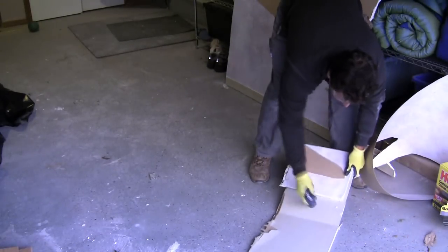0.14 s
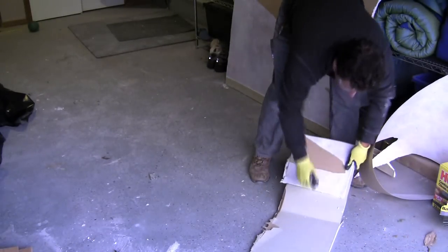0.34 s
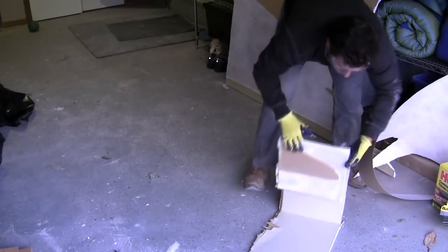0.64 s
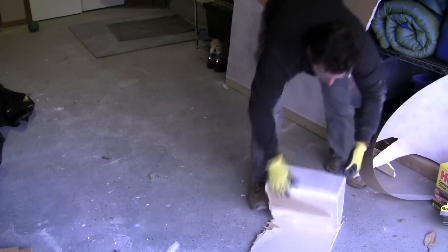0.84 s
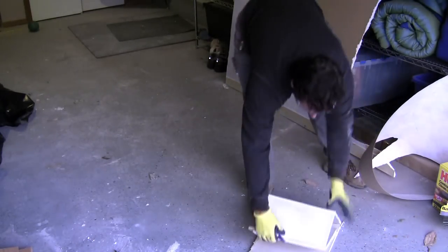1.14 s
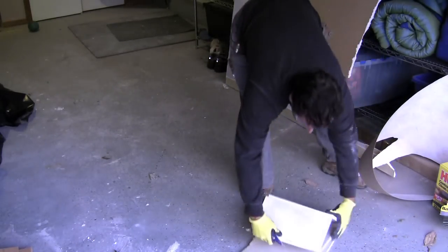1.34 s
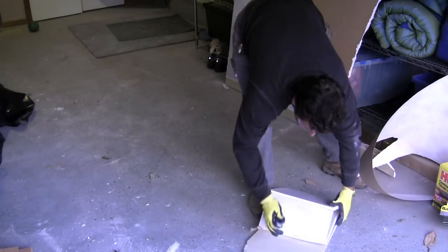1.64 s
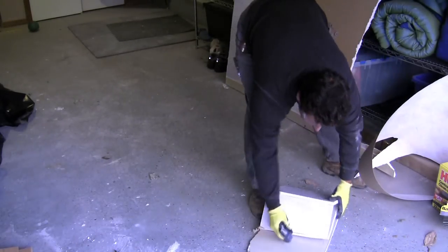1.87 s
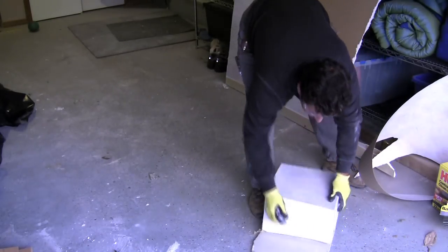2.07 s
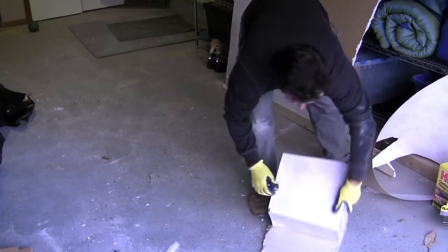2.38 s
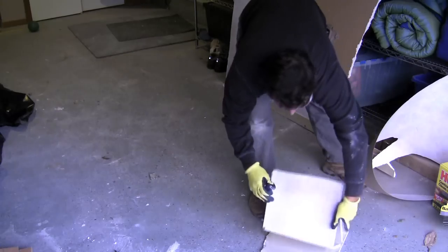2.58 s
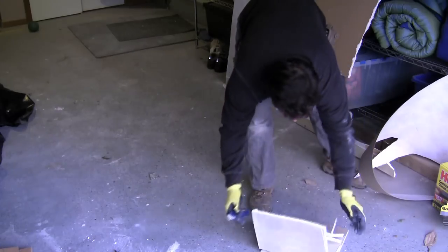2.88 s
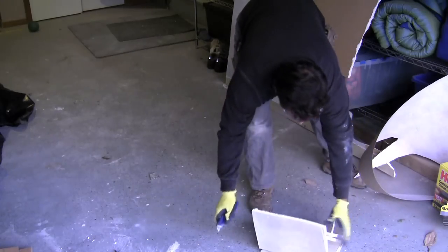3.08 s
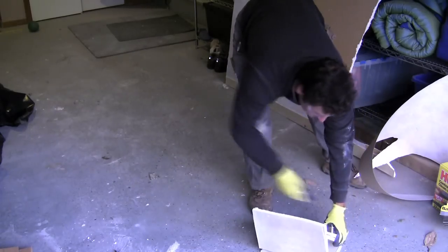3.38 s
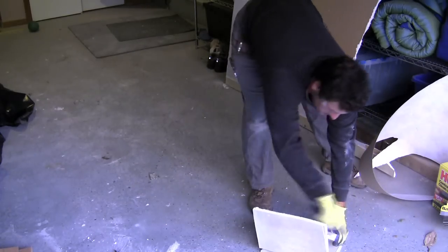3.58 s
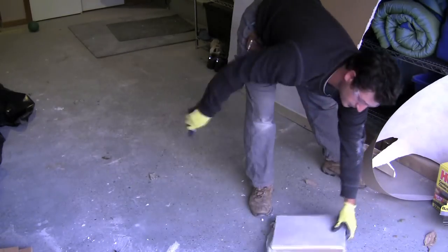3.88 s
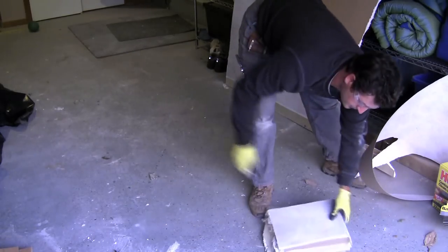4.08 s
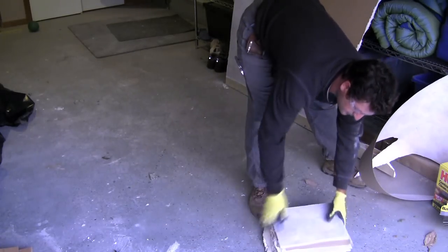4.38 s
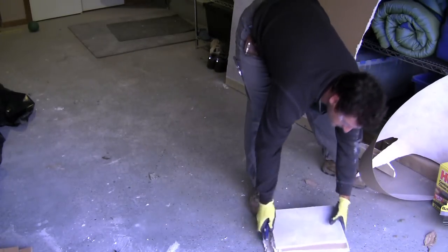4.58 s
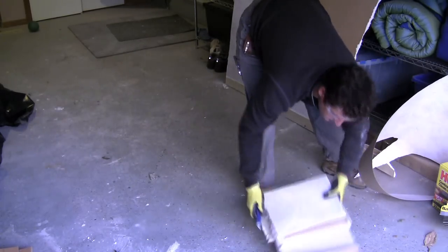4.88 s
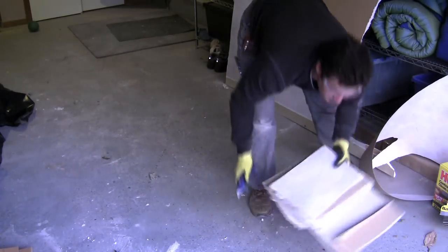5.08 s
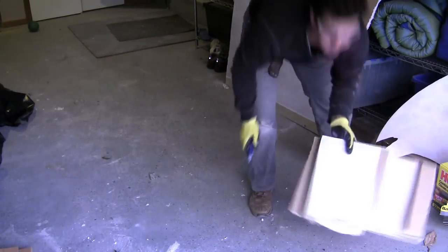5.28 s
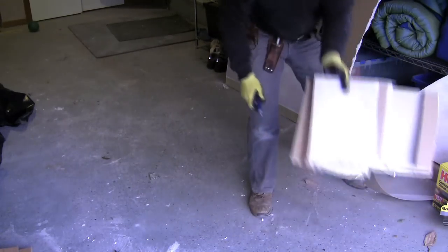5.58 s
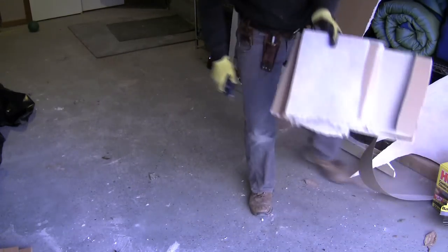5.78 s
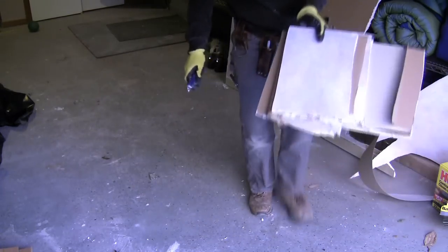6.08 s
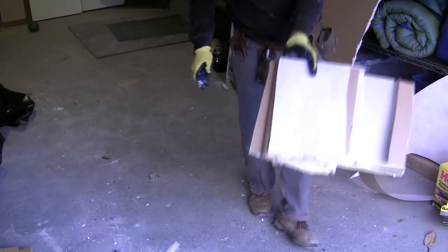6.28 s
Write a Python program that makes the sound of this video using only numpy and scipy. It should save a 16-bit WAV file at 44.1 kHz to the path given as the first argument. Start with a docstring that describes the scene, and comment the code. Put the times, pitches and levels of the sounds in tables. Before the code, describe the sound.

Hollow board thuds, crunchy plaster cracks and rasping scrapes over gritty concrete echo briefly in a garage, then fade to faint rustles and room noise.

```python
"""Scored drywall is folded and snapped on the concrete floor of a garage: knocks and snaps ring the
panel modes over a burst of crunch noise and a lingering tone. Crumbs are short decaying bright noise;
drags and scrapes are random grains that hiss as grit and shake the panel into rasp and drone.
Later only quieter drags, scrapes and crumbs remain, over steady room noise.
Floor and walls reflect the sounds, and the microphone stage flattens the loudest peaks."""
import sys
import numpy as np
from scipy import signal
from scipy.fft import rfft, irfft
from scipy.io import wavfile

SR = 44100
rng = np.random.default_rng(int(sys.argv[2]) if len(sys.argv) > 2 else 0)


def generate_wav(sig):
    """Save sig (samples, or channels by samples) to the path in sys.argv[1] as 16-bit PCM at SR."""
    pcm = np.round(np.clip(np.atleast_2d(sig).T, -1, 1) * 32767).astype(np.int16)
    wavfile.write(sys.argv[1], SR, pcm)


N = 283563
TIME = np.arange(N) / SR   # [s]
BLOW_SIZE = SR * 3 // 5    # length computed for each blow [samples]

# bending modes of the panels: (nominal frequency [Hz], relative level [dB], undamped t60 [s])
PANEL_MODES = [(125, -7.5, 0.25), (166, -2, 0.21), (189, -7, 0.099), (288.7, 4.5, 0.14), (338.4, 3.5, 0.15),
               (356.9, 6, 0.39), (429.4, 4, 0.17), (483.3, 2, .13), (554.5, 1.5, 0.087), (644.3, 0, 0.34),
               (686, -8.5, 0.59), (822.5, -2, 0.13), (915, -9.5, 0.03), (1018, 4.5, 0.094),
               (1100, -9, 0.15), (1231, 3, 0.053), (1313, -7.5, 0.007), (1534, 7, 0.049), (1683, -1, 0.014),
               (1940, 7.5, 0.025), (2346, -6.5, 0.017), (2310, -39, 0.0196), (2670, -4, 0.019),
               (2850, -3, 0.15), (2940, -17, 0.058)]
# spectrum of the grit and gypsum: (frequency [Hz], relative density [dB per Hz])
GRIT_SPECTRUM = [(2000, -23), (3200, -1), (4500, -6), (6300, -4.5), (9000, -10.5), (12500, -17),
                 (16000, -22.5)]


def knocks(low_cut_hz=120):
    """Board knocks on floor or stack are mostly dull, with soft contacts; core snaps are brighter."""
    # knocks: (time [s], main tone [Hz], level [dB], lingering tone [dB re level],
    #          dullness [dB per octave], rise [s])
    knock_table = [(0.001, 371.7, -17, 1, 6, 0.00036), (0.289, 361.3, -9, -13, 5, 0.00052),
                   (0.314, 468, -15.5, -6, 16, 0.0022), (0.402, 423, -19, -6.5, 10, 0.0065),
                   (1.523, 333.5, -16.5, -3, 10, 0.0016), (1.555, 402, -22.5, -1, 5, 0.0038),
                   (1.72, 349.6, -20, -2.5, 8, 0.0022), (2.024, 727, -24.5, 5, 27, 0.0052),
                   (2.5, 426, -23.5, -2.5, 12, 0.011), (2.564, 437, -33, -4, 14, 0.006),
                   (2.826, 1260, -23, -6, 29, 0.014), (2.954, 425, -16, -12, 6, 0.013),
                   (3.642, 401, -43, 2, 8, 0.0063), (4.006, 528, -24.5, 8, 4.5, .005),
                   (4.246, 543, -20, -1, 1, .016), (4.297, 605, -30.5, 1.5, 4, 0.0043),
                   (4.68, 257, -34.5, 1, 1, 0.0075)]
    # gypsum core snaps: (time [s], main tone [Hz], level [dB], lingering tone [dB re level],
    #                     bright crack [dB re clack], rise [s])
    snap_table = [(0.973, 391.4, -13.5, -3, -3, .005), (1.986, 790, -15, 3.5, -15, .0007),
                  (2.158, 797, -19, -1.5, -7.5, .002), (3.738, 398, -27, -0.5, -4.5, .0014),
                  (3.815, 1033, -22.5, -4, -8.5, .004), (4.035, 605, -18.5, -5.5, -15, .002),
                  (4.046, 1300, -13, -18.5, -13, .001)]
    snap_dull_db_per_octave, knock_crack_db = 1.3, -8

    blows = []
    for s, hz, level_db, tone_db, dull_db, rise_s in knock_table:
        blows.append((s, hz, level_db, tone_db, dull_db, knock_crack_db, rise_s))
    for s, hz, level_db, tone_db, crack_db, rise_s in snap_table:
        blows.append((s, hz, level_db, tone_db, snap_dull_db_per_octave, crack_db, rise_s))

    out = np.zeros((2, N))
    for s, *contact in blows:
        for track, sound in zip(out, blow(*contact)):
            add(track, s, sound)
    low_cut = signal.butter(3, low_cut_hz, "high", fs=SR, output="sos")
    return signal.sosfilt(low_cut, out)


def blow(tone_hz, level_db, tone_db, dull_db, crack_db, rise_s, wet_db=-3.5):
    """One contact excites ring and crunch, both reflected, plus a lingering tone; reach is its spectrum."""
    body_octaves, bass_db_per_octave = 0.75, 11
    clack_top_hz, crack_hz, airy_hz, airy_db = 3220, 7700, 16100, -12.5

    # flat from the main tone to body_hz, weaker to both sides
    body_hz = min(tone_hz * 2 ** body_octaves, clack_top_hz)
    clack_db = level_db - dull_db * np.log2(clack_top_hz / body_hz)
    reach = [
        (tone_hz / 2 ** 2, level_db - 2 * bass_db_per_octave),
        (tone_hz, level_db),
        (body_hz, level_db),
        (clack_top_hz, clack_db),
        (crack_hz, clack_db + crack_db),
        (airy_hz, clack_db + crack_db + airy_db),
    ]
    attack = np.minimum(TIME[:BLOW_SIZE] / rise_s, 1)
    struck = garage(attack * (ringing(reach) + crunch(reach)), wet_db)
    return struck + attack * from_db(level_db + tone_db) * main_tone(tone_hz)


def ringing(reach, ring_db=-9, scatter_db=2.5, detune=0.0146):
    """The struck panel rings as decaying sines at its bending modes, as far as the contact reaches them."""
    t = TIME[:BLOW_SIZE // 3]
    hz, mode_db, t60 = np.transpose(PANEL_MODES)
    strength_db = ring_db + mode_db + at_hz(reach, hz) + scatter_db * rng.standard_normal(len(hz))
    strength = from_db(strength_db) * rng.choice([-1, 1], len(hz))
    pitch_hz = hz * (1 + detune * rng.standard_normal(len(hz)))   # the grip shifts the modes
    modes = np.sin(2 * np.pi * pitch_hz[:, None] * t) * from_db(-60 * t / t60[:, None])
    return np.pad(strength @ modes, (0, BLOW_SIZE - len(t)))


def crunch(reach, dull_db=5, dull_t60=0.071, bright_db=7.0, bright_t60=0.025, split_hz=3800, width=0.43):
    """The gypsum core gives way: a very short bright crack over a duller, longer crunch."""
    t = TIME[:BLOW_SIZE]
    hz = np.maximum(np.fft.rfftfreq(BLOW_SIZE, 1 / SR), 30)
    noise = stereo_noise(size=BLOW_SIZE)
    centre = noise.mean(axis=0)
    noise = centre + width * (noise - centre)   # direct sound comes from straight ahead
    core = rfft(noise) * np.sqrt(SR / 2 / hz) * from_db(at_hz(reach, hz))   # levels per octave
    bright_share = 1 / (1 + (split_hz / hz) ** 4)
    dull = irfft(core * (1 - bright_share), BLOW_SIZE)
    bright = irfft(core * bright_share, BLOW_SIZE)
    return dull * from_db(dull_db - 60 * t / dull_t60) + bright * from_db(bright_db - 60 * t / bright_t60)


def main_tone(hz, t60=0.48, wander_hz=30, flutter_db=3):
    """The piece's strongest resonance lingers between the walls, wavering as its reflections overlap."""
    t = TIME[:BLOW_SIZE]
    wandering_hz = hz + wander_hz * drift(rate=65.7, size=BLOW_SIZE)
    phase = 2 * np.pi * np.cumsum(wandering_hz) / SR
    level_db = flutter_db * drift(rate=56.2, size=BLOW_SIZE) - 60 * t / t60
    return np.sin(phase) * from_db(level_db)


def crumbs(level_db=-9, t60=0.078):
    """Gypsum crumbs break off: tiny fractures as grit-coloured noise with exponential decay."""
    # (time [s], relative peak level [dB])
    crumb_table = [(0.1486, -23), (0.5425, -39), (1.0534, -26), (1.6611, -33), (2.583, -21.5), (2.837, -18),
                   (3.118, -32), (3.8754, -30), (4.2106, -21), (4.6808, -32), (5.1532, -37.5),
                   (5.3413, -45), (5.895, -44), (6.026, -42)]
    envelope, t = np.zeros(N), TIME[:SR // 10]
    for s, peak_db in crumb_table:
        add(envelope, s, from_db(peak_db + level_db - 60 * t / t60))
    return envelope * colour(stereo_noise(), GRIT_SPECTRUM)


def dragging(judder_db=1.5):
    """The edge judders over grit: dense grains hiss, rasp in the paper and make the panel drone."""
    # both: (frequency [Hz], relative density [dB per Hz])
    rasp_spectrum = [(600, 0), (1000, 1.5), (1500, 0), (2100, 2), (3100, 1.5), (4200, -8), (6500, -17.5)]
    drone_spectrum = [(100, -11.5), (200, -1.5), (330, -5.5), (450, 0), (560, -10), (750, -1.5),
                      (1000, -12.5), (1600, -19)]
    grit_gain, rasp_gain, drone_gain = friction()
    slips = from_db(judder_db * drift(rate=83))
    hiss = scatter(slips * grains(per_s=6500, spread_db=2.0), width=0.62)
    contact = slips * grains(per_s=3000, spread_db=3.0)
    shaken = panel(contact)
    grit = colour(hiss, GRIT_SPECTRUM)
    rasp = colour(shaken + 0.74 * scatter(contact, width=0.69), rasp_spectrum)
    drone = colour(shaken + 0.1 * contact, drone_spectrum)
    return grit_gain * grit + rasp_gain * rasp + drone_gain * drone


def friction(edge_s=0.024):
    """Gains of grit, rasp and drone: drags follow hiss and load; scrapes bite, sag and let go."""
    # one curve a drag over the gritty floor: (time [s], relative hiss level [dB])
    drag_curves = [
        [(0.0, -37.5), (0.014, -39.5), (0.074, -39.5), (0.122, -44), (0.154, -41), (0.16, -40.5), (0.27, -51.5)],
        [(0.36, -55), (0.52, -48), (0.542, -44.5), (0.608, -51), (0.626, -47), (0.802, -55.5), (0.922, -50),
         (0.95, -50)],
        [(1.1, -55), (1.346, -58), (1.446, -46), (1.712, -36.5), (1.718, -37), (1.832, -55), (1.858, -51),
         (1.9, -60)],
        [(2.2, -42.5), (2.4, -43.5), (2.472, -46.5), (2.582, -39), (2.632, -45), (2.816, -46), (2.836, -40),
         (2.93, -45.5)],
        [(3.26, -54.5), (3.286, -61.5), (3.348, -57), (3.468, -57), (3.578, -64), (3.672, -58), (3.7, -65),
         (3.71, -61)],
        [(4.5, -74), (4.516, -51), (4.544, -48.5), (4.568, -56), (4.62, -52.5), (4.758, -44), (5.08, -66),
         (5.1, -67)],
        [(5.36, -71), (5.476, -72), (5.53, -66), (5.732, -65), (5.896, -55.5), (6.004, -83), (6.03, -68),
         (6.1, -76)],
    ]
    # weight on the board, one value a drag: (load [dB])
    loads_db = [13, 3, 5.5, 8.5, 1.5, -0.5, 5]
    # short scrapes and paper rips: (time [s], length before release [s], rasp level [dB],
    #                               grit [dB re rasp], drone [dB re rasp])
    scrape_table = [(0.897, 0.0077, -42, -9, -15), (0.999, 0.089, -32.5, -26, 8.5),
                    (1.752, 0.015, -27.5, -20, 5.5), (2.02, 0.12, -37.5, -18, 11.5),
                    (2.12, 0.057, -35, -4, 4), (2.174, 0.049, -26.5, -15, 0), (2.32, 0.054, -38, -8, 8.5),
                    (2.559, 0.045, -40.5, 1, 16.5), (2.962, 0.062, -35, -5.5, 9.5),
                    (3.732, 0.11, -21.5, -2, -5), (3.863, 0.025, -25.5, -7.5, -12), (3.922, .1, -41, 1, 0),
                    (4.086, 0.13, -30.5, -17, 0), (4.208, 0.074, -32.5, -10, 4.5),
                    (4.536, 0.034, -43.5, -8, -12), (4.69, 0.061, -43.5, -8, 6),
                    (5.151, 0.011, -50, -11, -11), (5.812, 0.021, -45, -16, -4),
                    (5.838, 0.02, -37.5, -19, -3.5), (5.893, 0.018, -38.5, -15, -9)]
    drag_grit_db, drag_rasp_db, drag_drone_db, rasp_follows_load = 2.5, 2, 1, 0.39
    attack_s, sag_db_per_s, release_db_per_s = 0.0079, 37, 600

    power = np.zeros((3, N))
    for drag, load_db in zip(drag_curves, loads_db):
        s, hiss_db = np.transpose(drag)
        touching = np.clip(np.minimum(TIME - s[0], s[-1] - TIME) / edge_s + 1, 0, 1)
        envelope = touching * from_db(np.interp(TIME, s, hiss_db))
        rasp_db = drag_rasp_db + rasp_follows_load * load_db
        shares = from_db([drag_grit_db, rasp_db, drag_drone_db + load_db])
        power += np.outer(shares, envelope) ** 2

    t = TIME[:BLOW_SIZE]
    for s, length_s, rasp_db, grit_db, drone_db in scrape_table:
        fall_db = sag_db_per_s * t + release_db_per_s * np.maximum(t - length_s, 0)
        envelope = np.minimum(t / attack_s, 1) * from_db(rasp_db - fall_db)
        for track, share in zip(power, from_db([grit_db, 0, drone_db])):
            add(track, s, (share * envelope) ** 2)
    return np.sqrt(power)


def panel(force, damping=1.78):
    """A running force drives two-pole panel resonators, damped by hands and floor."""
    out = np.zeros(N)
    for k, (hz, level_db, t60) in enumerate(PANEL_MODES):
        r = from_db(-60 * damping / (t60 * SR))   # pole radius
        w = 2 * np.pi * hz / SR
        mode = signal.lfilter([1 - r, 0, r - 1], [1, -2 * r * np.cos(w), r * r], force)
        out += (-1) ** k * from_db(level_db) * mode
    return out


def grains(per_s, spread_db):
    """Clicks of either sign at random moments, most small and a few large."""
    sizes_db = spread_db * np.minimum(rng.exponential(1, N), 5)
    sizes = from_db(sizes_db) * rng.choice([-1, 1], N)
    return sizes * (rng.random(N) < per_s / SR)


def scatter(clicks, width):
    """Each grain reaches the two ports with a balance of its own."""
    balance = width * rng.standard_normal(N)
    return clicks * (1 + balance * np.array([[1], [-1]]))


def garage(x, wet_db, gap_s=.001, build_s=0.0021):
    """Floor and walls answer within milliseconds: a fresh noise tail with its own decay in each band."""
    # (band centre [Hz], t60 [s], relative strength of the reflections [dB])
    bands = [(102, 0.89, 0.5), (251, 0.57, -3), (495, 0.39, 0.5), (1130, 0.63, 1), (2980, 0.56, -2.5),
             (6080, 0.56, -2), (15000, 0.47, -1)]
    t, hz = TIME[:BLOW_SIZE], np.fft.rfftfreq(BLOW_SIZE, 1 / SR)
    noise, tail = rfft(stereo_noise(size=BLOW_SIZE)), 0
    centres_hz = np.array(bands)[:, 0]
    for (_, t60, level_db), share in zip(bands, np.eye(len(bands))):
        fade = from_db(-60 * t / t60) * np.clip((t - gap_s) / build_s, 0, 1)
        band = irfft(noise * at_hz(np.c_[centres_hz, share], hz), BLOW_SIZE)
        tail = tail + from_db(level_db) * band * fade / np.sqrt(2 * np.sum(fade ** 2))
    reflections = signal.fftconvolve(x, tail, axes=1)[:, :x.shape[1]]
    return x + from_db(wet_db) * reflections


def room_air(level_db=-47.5):
    """Steady diffuse background: coloured stereo noise."""
    # (frequency [Hz], relative density [dB per Hz])
    air_spectrum = [(15, -77), (25, -16.5), (92, -8), (175, 4), (270, -6), (575, -7), (624, -6), (775, -11),
                    (1400, -17), (1700, -22.5), (3720, -27), (4370, -32.5), (6050, -30.5), (13600, -44.5),
                    (16000, -63.5)]
    return from_db(level_db) * colour(stereo_noise(), air_spectrum)


def stereo_noise(size=N):
    """Diffuse noise whose likeness at the two ports depends on frequency, highest in the mids."""
    # (frequency [Hz], left-right correlation [-])
    likeness = [(50, 0.2), (150, 0.24), (280, 0.67), (550, 0.63), (1100, 0.62), (2200, 0.17), (4500, 0.12),
                (14000, 0.16)]
    alike = np.clip(at_hz(likeness, np.fft.rfftfreq(size, 1 / SR)), -.99, .99)
    mid, side = rfft(rng.standard_normal((2, size)))
    return irfft(np.sqrt(1 + alike) * mid + np.sqrt(1 - alike) * side * [[1], [-1]], size)


def colour(x, spectrum):
    """Filter a steady sound to a spectrum that falls away beyond its ends; rms 1."""
    closed = [(spectrum[0][0] / 2, -70)] + list(spectrum) + [(spectrum[-1][0] * 2, -70)]
    gain = from_db(at_hz(closed, np.fft.rfftfreq(N, 1 / SR)))
    return rms_one(irfft(rfft(x) * gain, N))


def drift(rate, size=N):
    """Slow chance: straight lines between normal random knots, rate knots per second."""
    knots = rng.standard_normal(4000)
    return np.interp(TIME[:size] * rate, np.arange(len(knots)), knots)


def at_hz(points, hz):
    """Read a table on a log-frequency axis."""
    f, value = np.transpose(points)
    return np.interp(np.log(np.maximum(hz, 1)), np.log(f), value)


def from_db(db):
    """Decibels to amplitude ratio."""
    return 10 ** (np.asarray(db) / 20)


def rms_one(x):
    """Scale to rms 1."""
    return x / np.sqrt(np.mean(x ** 2) + 1e-20)


def add(track, s, sound):
    """Lay a sound into a track at time s."""
    start = max(round(s * SR), 0)
    track[start:start + len(sound)] += sound[:N - start]


def scene():
    """Sum the blows, the reflected drags and crumbs, and the background."""
    balance = from_db(np.array([[.4], [-.4]]))   # left slightly louder
    scrapes = garage(dragging() + crumbs(), wet_db=-3.5) * balance
    return knocks() + scrapes + room_air()


def record(dry, ceiling=.72, cutoff_hz=16200):
    """The microphone stage flattens the loudest peaks; a steep low-pass cuts the top."""
    clipped = dry / (1 + (dry / ceiling) ** 12) ** (1 / 12)
    low_pass = signal.ellip(10, .1, 80, cutoff_hz, fs=SR, output="sos")
    return signal.sosfilt(low_pass, clipped)


dry = scene()
out = record(dry)
generate_wav(out)
```